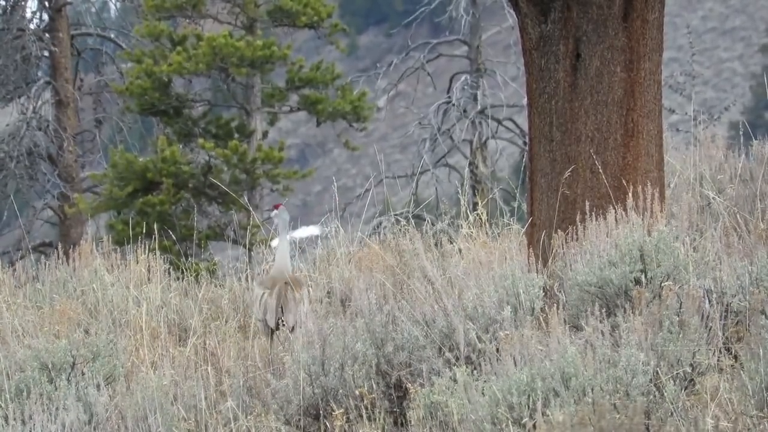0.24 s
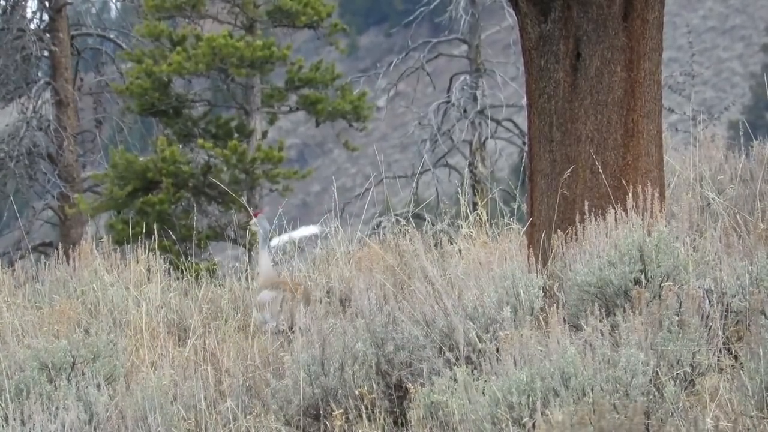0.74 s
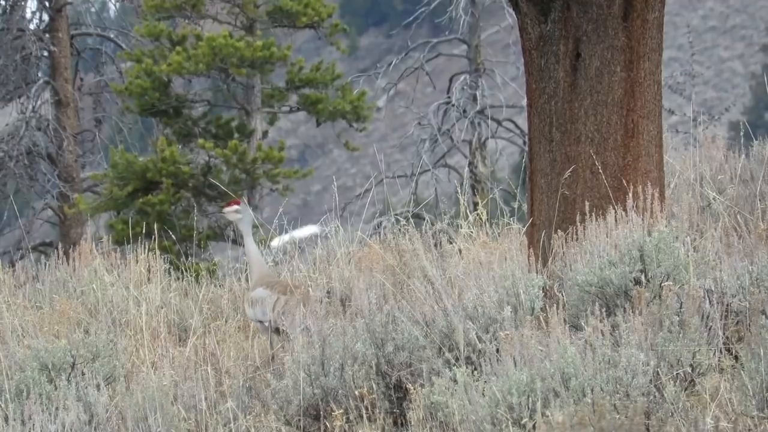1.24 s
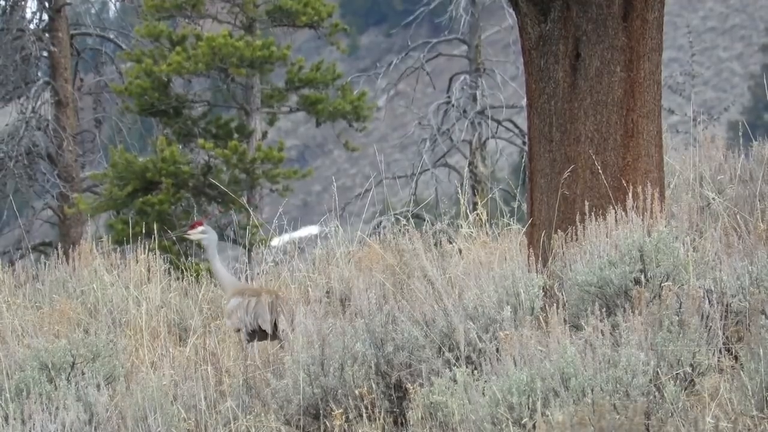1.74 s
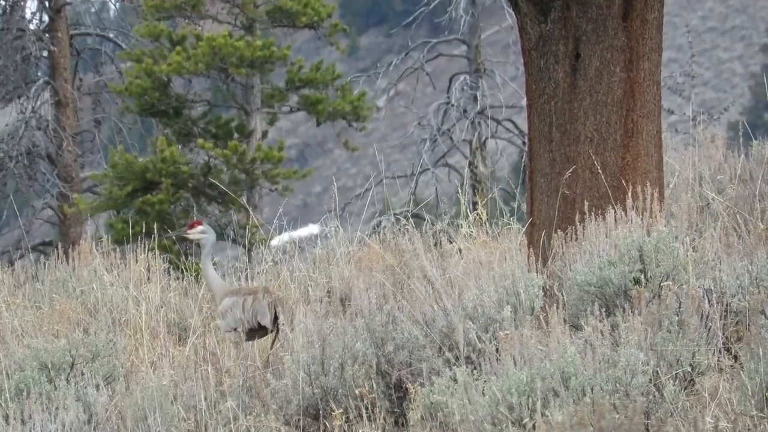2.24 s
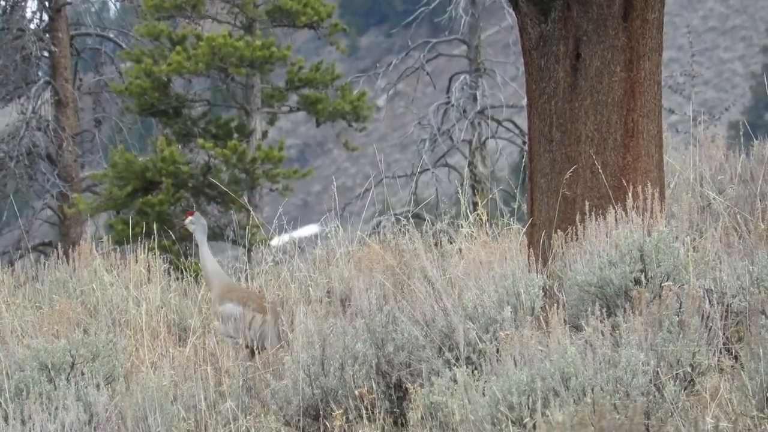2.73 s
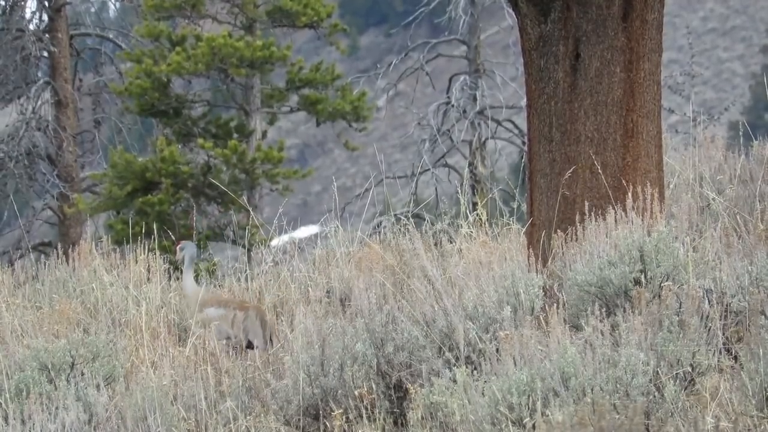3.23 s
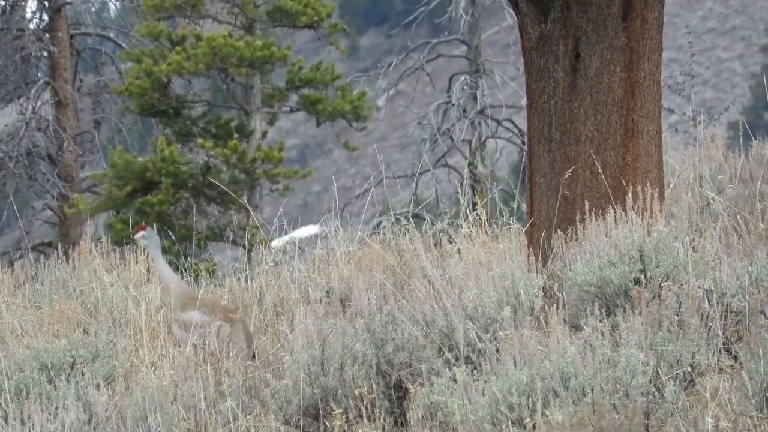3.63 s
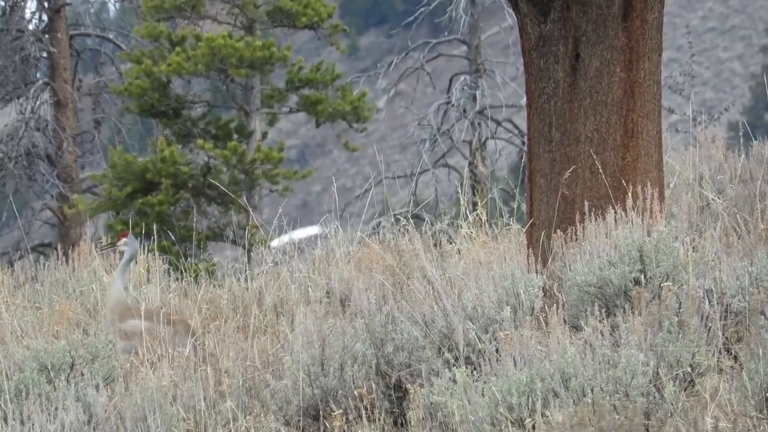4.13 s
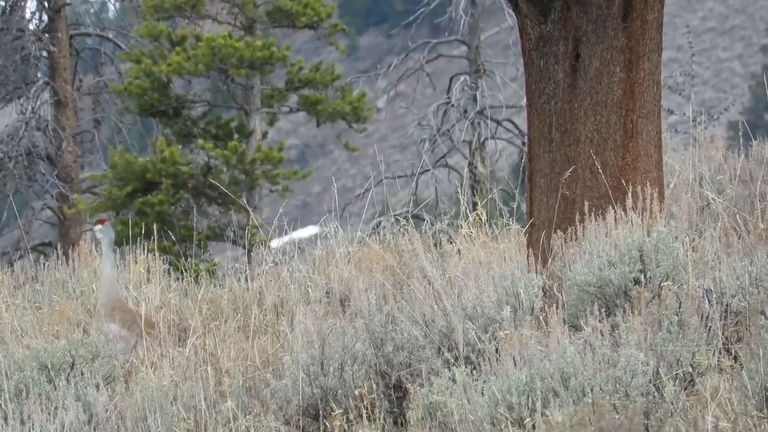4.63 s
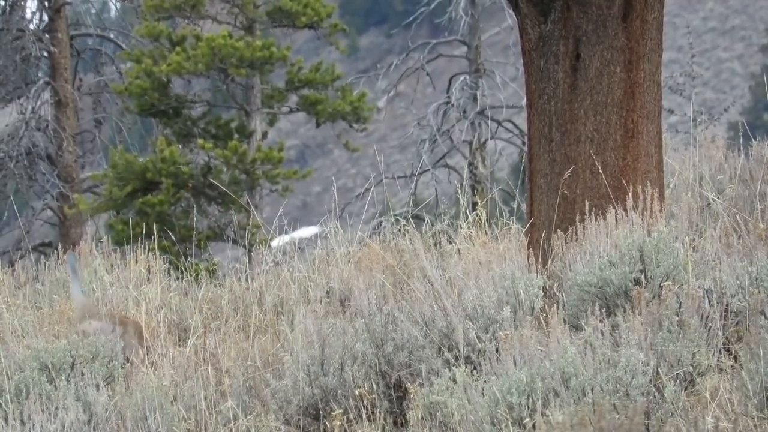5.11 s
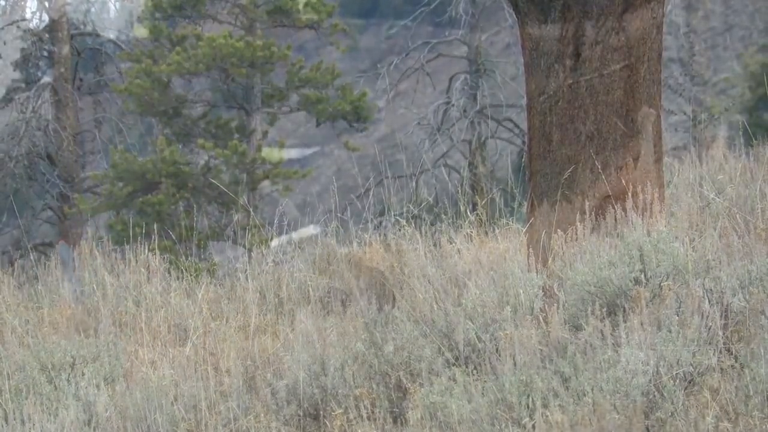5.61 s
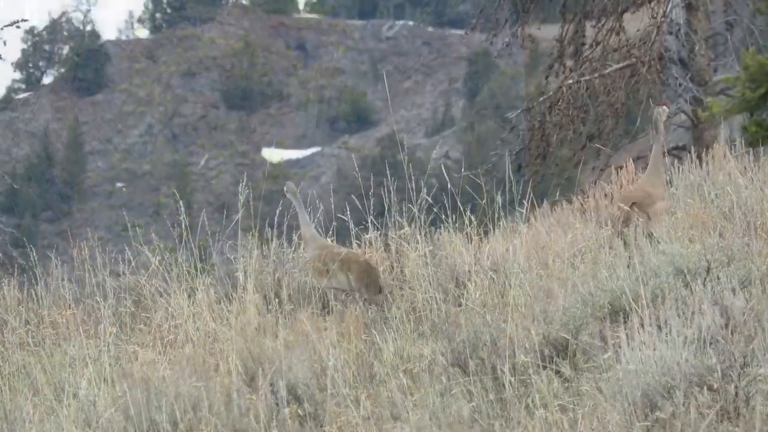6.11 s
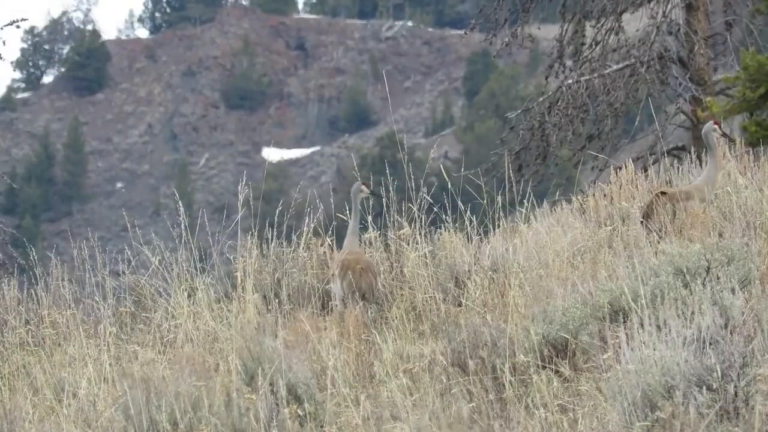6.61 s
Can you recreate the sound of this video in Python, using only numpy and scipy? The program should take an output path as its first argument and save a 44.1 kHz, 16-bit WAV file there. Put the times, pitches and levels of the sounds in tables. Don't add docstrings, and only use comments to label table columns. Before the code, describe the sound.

Two cranes call in turn, near and loud, on a wooded grassy slope. Each hoarse opening note breaks into a fast, hollow trumpeting rattle, one bird lower, one higher. Trunks and a distant hillside throw back blurred echoes. A small songbird whistles briefly early on, dry stalks snap, grass rustles and wind bumps the microphone. Near the end the calls turn soft and sparse in open ground.

```python
import sys
import numpy as np
from scipy import signal
from scipy.fft import rfft, irfft, next_fast_len
from scipy.io import wavfile
from scipy.ndimage import uniform_filter1d

SR = 44100
rng = np.random.default_rng(int(sys.argv[2]) if len(sys.argv) > 2 else 0)


def to_wav(sig):
    pcm = np.clip(np.atleast_2d(sig), -1, 1) * 32767
    pcm = np.round(pcm).astype(np.int16)
    wavfile.write(sys.argv[1], SR, pcm.T)


def volts(x):
    e = np.asarray(x, float) / 20
    return 10 ** e


N = 302526
CHANGE_START_S, CHANGE_END_S = 5.6, 5.68

LOW_VOICE = [0, -8, -16.5, -20, -19, -24.5, -30.5, -34.5, -40.5]


def evened(x):
    return x / np.sqrt(np.mean(x ** 2) + 1e-20)


def read(points, hz):
    f, value = np.transpose(points)
    return np.interp(np.log(hz + 1), np.log(f + 1), value)


def colour(x, points):
    size = next_fast_len(x.shape[-1])
    gain = volts(read(points, np.fft.rfftfreq(size, 1 / SR)))
    return irfft(rfft(x, size) * gain, size)[..., :x.shape[-1]]


def add(mix, s, sound):
    part = mix[..., max(round(s * SR), 0):][..., :sound.shape[-1]]
    part += sound[..., :part.shape[-1]]


def openness(t):
    return np.interp(t, [CHANGE_START_S, CHANGE_END_S], [0, 1])


def swells(t, steady_db, s, half, db):
    bells = volts(db)[:, None] ** 2 * np.exp(-((t - s[:, None]) / half[:, None]) ** 2)
    return np.sqrt(volts(steady_db) ** 2 + bells.sum(0))


def background():
    # f/Hz, level/dB per Hz
    air_spectrum = [(20, -54), (45, -39), (90, -2), (200, 2), (480, 4.5), (1000, -5.5), (2000, -12.5),
                    (3100, -15), (5000, -20.5), (8000, -28), (13000, -37), (15400, -45)]
    grass_spectrum = [(1000, -16), (3000, -12.5), (5000, 0), (8000, 3), (11000, -1), (13000, -5),
                      (15400, -36)]
    wind_spectrum = [(15, 6), (32, 14), (50, 21), (90, 16.5), (200, -41)]
    # f/Hz, left-right likeness
    likeness = [(60, 1), (130, -0.7), (290, -0.64), (640, -0.9), (1400, -0.74), (3090, 0.087), (6790, 0.02),
                (14900, -0.22)]
    # t/s, half length/s, grass level/dB, low rustle level/dB
    swishes = [
        (0.732, 0.036, -70, -45),
        (2.63, 0.035, -81, -40),
        (4.878, 0.13, -57, -44.5),
        (5.255, 0.39, -63.5, -47.5),
    ]
    # t/s, half length/s, peak level/dB
    puffs = [
        (.13, .04, -70),
        (3.17, .1, -67),
        (4.028, 0.046, -46),
        (4.2, .1, -55),
        (5.58, 0.036, -49),
        (5.798, 0.047, -44),
        (6.073, 0.016, -55),
        (6.25, 0.15, -59),
        (6.51, 0.078, -55.5),
    ]
    frames, hz = N // 256 + 5, np.fft.rfftfreq(1024, 1 / SR)
    t = np.arange(frames) * 256 / SR
    a, b, c, d, e, f, patches = rng.standard_normal((frames, 513, 7)).T
    patches = evened(uniform_filter1d(uniform_filter1d(patches, 14, 0), 10, 1))

    s, half, swish_db, rustle_db = np.transpose(swishes)
    fade_db = -1.5 * np.maximum(t - CHANGE_END_S, 0)
    air_gain = swells(t, -41.5 - 6 * openness(t) + fade_db, s, half, rustle_db)
    grass_gain = swells(t, -71 - 9 * openness(t) + fade_db, s, half, swish_db)
    wind_gain = swells(t, -82, *np.transpose(puffs)) * volts(-10.0)
    air = evened(volts(read(air_spectrum, hz)))[:, None] * air_gain * volts(1.8 * patches)
    grass = evened(volts(read(grass_spectrum, hz)))[:, None] * grass_gain * volts(5.0 + 1.4 * patches)
    wind = evened(volts(read(wind_spectrum, hz)))[:, None] * wind_gain

    same = np.clip(read([(40, 0.27)] + likeness, hz), -1, 1)[:, None]
    left = a + 1j * b
    right = same * left + np.sqrt(1 - same ** 2) * (c + 1j * d)
    field = np.array([left, right])
    plain = np.std(signal.istft(left, nperseg=1024, noverlap=768)[1])
    struck = (e + 1j * f + 1.3 * field) * wind
    spectra = np.array([field * np.hypot(air, grass), struck]) / plain
    hiss, rumble = signal.istft(spectra, nperseg=1024, noverlap=768)[1][..., :N]
    return colour(hiss, [(35, -27), (70, -0.5)]) + rumble


def snaps():
    # t/s, peak level/dB, left-right/dB, lowest f/Hz, highest f/Hz
    stalks = [
        (0.76, -34, 3, 2980, 13500),
        (2.6184, -37, 2, 3000, 13500),
        (2.6612, -29, 1, 2940, 13500),
        (4.6494, -35, 6, 3000, 13500),
        (4.7237, -41, 2, 2980, 13500),
        (5.608, -41, -2, 3000, 13500),
        (5.7134, -43, 1, 3000, 13500),
        (5.787, -42, 10, 3000, 13500),
              (5.169, -23, 0, 407, 2500),
        (5.43, -31, 0, 300, 1700),
        (5.888, -37.5, -1, 2200, 13500),
        (6.121, -35, 0, 250, 13500),
    ]
    out, t = np.zeros((2, N)), np.arange(700) / SR
    decay = np.exp(-t / .0006) + .12 * np.exp(-t / .004)
    for (s, db, pan_db, low_hz, high_hz), noise in zip(stalks, rng.standard_normal((20, 700))):
        band = signal.butter(3, [low_hz, high_hz], "band", fs=SR)
        crack = signal.lfilter(*band, noise * decay)
        sides = volts(db + np.array([[pan_db], [-pan_db]]) / 2)
        add(out, s, sides * crack / abs(crack).max())
    return out


def songbird():
    # t/s, length/s, level/dB, first f/Hz, last f/Hz
    chirps = [(.865, .045, -53, 2400, 2550), (.995, .025, -52, 3900, 3850), (1.005, .025, -55, 3150, 3100),
              (1.06, .05, -51, 2250, 2600), (1.11, .025, -56, 3150, 3000), (1.705, .035, -52, 2780, 2620),
              (1.725, .03, -48, 2700, 3650), (1.745, .035, -47, 3500, 3000), (1.82, .025, -58, 3600, 3750),
              (1.875, .028, -52, 3300, 2900), (1.885, .02, -58, 5500, 5350), (1.9, .03, -57, 4000, 4150),
              (2.0, .045, -54, 3400, 3550), (2.045, .04, -57, 3750, 3950), (2.082, .048, -49, 3650, 2800),
              (2.13, .03, -58, 4900, 4700), (2.19, .035, -58, 5300, 5450), (2.2, .03, -58, 3200, 2900)]
    out = np.zeros(N)
    for s, length, db, first_hz, last_hz in chirps:
        hz = np.linspace(first_hz, last_hz, round(length * SR))
        whistle = np.sin(2 * np.pi * np.cumsum(hz) / SR) * np.hanning(len(hz))
        add(out, s, volts(db + 3) * whistle)
    return out


def hillside(breath):
    # t/s, level/dB
    effort = [(0, -31), (.2, -36.5), (1.15, -36), (1.45, -31.5), (1.72, -38.5), (2.44, -36.5),
              (2.95, -40.5), (3.6, -40), (3.99, -33.5), (4.22, -36.5), (4.6, -36.5), (4.9, -34.5),
              (5.16, -35), (5.39, -34), (5.6, -39.5), (6.15, -50.5), (6.86, -42.5)]
    # f/Hz, level/dB
    path = [(450, 3), (650, 6.5), (950, -2), (1600, -10.5), (2500, -16), (5000, -16.5)]
    # rise/s, hold/s, fall/s, pitch sag 0-1, breath/dB, echo delay/s, echo tilt/dB per octave
    far_pulse = (.0013, .005, .0035, .03, -20, .032, 4)
    times, crowds = np.arange(0, N / SR - .06, .007), []
    for chance in rng.random((2, N // 200, 4)):
        rows = []
        for s, (late, soft, tune, bird) in zip(times, chance):
            hz = (770 if bird < .5 else 895) * (.9 + .18 * tune)
            rows.append((s + .007 * late, -6 * soft, hz, 0, -3))
        crowds.append(evened(colour(rattle(rows, LOW_VOICE[:3], far_pulse, breath), path)))
    s, db = np.transpose(effort)
    wide = 0.24 * np.array([[1], [-1]]) * crowds[1]
    return volts(np.interp(np.arange(N) / SR, s, db)) * (crowds[0] + wide)


def wood(x):
    # f/Hz, t60/s
    decays = [(500, 0.73), (1300, 0.41), (3000, 0.42), (8000, 0.26)]
    taps = np.zeros((2, SR // 2))
    at = np.arange(300, SR // 2 - 20, 20)
    at = at + rng.integers(0, 20, (2, len(at)))
    np.put_along_axis(taps, at, rng.choice([-1., 1.], at.shape), 1)
    taps += taps[::-1]
    hz, t, z = signal.stft(taps, SR, nperseg=256)
    tail = signal.istft(z * volts(-60 * t / read(decays, hz)[:, None]), SR, nperseg=256)[1]
    wet = signal.fftconvolve(x[None], tail / np.linalg.norm(tail[0]), axes=1)[:, :N]
    return volts(-5.5 - 5 * openness(np.arange(N) / SR)) * wet


def stack(hz, voice_db, tilt_db, uneven_db):
    k = np.arange(1, len(voice_db) + 1)[:, None]
    level = volts((np.array(voice_db) + uneven_db)[:, None] + tilt_db * np.log2(k))
    return (level * np.sin(2 * np.pi * k * np.cumsum(hz) / SR + k ** 2)).sum(0)


def openings(breath):
    # t/s, mouth resonance f/Hz, level/dB, first f/Hz, last f/Hz
    notes = [(.08, 1200, -43, 600, 580), (.48, 2030, -31.5, 499.5, 541), (1.145, 1400, -37.5, 638, 706),
             (1.345, 1290, -36, 639, 662), (2.89, 1170, -34.5, 562.7, 609), (3.05, 1170, -38, 592, 585),
             (3.777, 1250, -33.5, 590.4, 663), (4.005, 1180, -34, 554, 617), (4.715, 1550, -33.5, 704, 787),
             (4.97, 1210, -31.5, 590, 590), (5.472, 1330, -32, 622, 699.5), (5.822, 1780, -39, 605, 593),
             (6.445, 1274, -46, 604, 663)]
    voice_db = [5.5, -3, -4.5, -13.5, -11.5, -19, -32, -35, -44]
    rough = .24
    out, wobble = np.zeros(N), evened(uniform_filter1d(rng.standard_normal(N), 130))
    u = np.linspace(0, 1, 3400)
    swell = signal.windows.tukey(len(u), .45) * (.4 + .8 * np.sin(np.pi * u) ** 2)
    for s, mouth_hz, db, first_hz, last_hz in notes:
        at = slice(round(s * SR), round(s * SR) + len(u))
        hz = (first_hz + (last_hz - first_hz) * u) * (1 + .11 * rough * wobble[at])
        orders_hz = np.mean(hz) * np.arange(1, len(voice_db) + 1)
        mouth_db = 8.4 * np.exp(-((orders_hz - mouth_hz) / 300) ** 2)
        tone = evened(stack(hz, voice_db, 0, mouth_db))
        gate = 1 + 2.0 * np.cos(2 * np.pi * np.cumsum(hz) / SR)
        rasp = (1.4 - u) * gate * breath[at]
        out[at] += volts(db) * swell * (tone + 0.92 * rough * volts(-6.0 * openness(s)) * rasp)
    return out


def rattle(rows, voice_db, shape, breath):
    rise, hold, fall, sag, breath_db, delay, echo_tilt_db = shape
    t, out, voice_db = np.arange(1700) / SR, np.zeros(N), np.array(voice_db, float)
    attack = np.sin(np.pi / 2 * np.clip(t / rise, 0, 1))
    body = attack * np.exp(-np.maximum(t - rise - hold, 0) / fall)
    blurred = np.convolve(body, np.hanning(400) / 200)[:len(t)]
    overtone = np.arange(len(voice_db)) > 0
    thin_db = -5 * ~overtone
    jitter = evened(uniform_filter1d(rng.standard_normal(N + SR), 70))
    uneven = rng.standard_normal((len(rows), 2, len(voice_db))) * overtone
    for (s, db, hz, tilt_db, echo_db), (here, there) in zip(rows, uneven):
        at = slice(round(s * SR), round(s * SR) + len(t))
        pitch = hz * (1 + sag * (1 - 2 * t / (hold + fall)).clip(-1) + .017 * jitter[at])
        echo_pitch = hz * (1.018 + .018 * jitter[at])
        puff = volts(breath_db + 2 * tilt_db) * breath[at]
        direct = stack(pitch, voice_db, tilt_db, 2 * here) + puff
        thrown = stack(echo_pitch, voice_db, tilt_db + echo_tilt_db, 2 * there + thin_db) + 2 * puff
        add(out, s, volts(db) * body * direct)
        add(out, s, volts(db + echo_db + 8) * np.hanning(len(t)) * puff)
        add(out, s + delay, volts(db + echo_db) * blurred * thrown)
    return out


def pulses(calls, tone):
    hz, drop, tilt_db, open_db = tone
    first_gap_s, last_gap_s, quicken = .061, .040, .6
    gaps = last_gap_s + (first_gap_s - last_gap_s) * quicken ** np.arange(11)
    beats = np.r_[0, np.cumsum(gaps)]
    rows = []
    for (start, end, db, end_db, echo_db), chance in zip(calls, rng.standard_normal((len(calls), 3, 12))):
        last = max(abs(beats - end + start).argmin(), 1)
        u = np.arange(last + 1) / last
        a, b, c = chance[:, :last + 1]
        times = start + beats[:last + 1] * (end - start) / beats[last]
        levels_db = db + end_db * u ** 2 + 1.2 * a
        pitches = hz * (1 - drop * u + .015 * b)
        tilts_db = tilt_db + open_db * openness(start) + 1.5 * u * (1 - 2 * openness(start))
        rows += zip(times, levels_db, pitches, tilts_db, echo_db + 2.5 * c)
    return [(max(s, 0), *rest) for s, *rest in rows if s > -.015]


def low_crane(breath):
    # first pulse t/s, last pulse t/s, peak level/dB, change by the end/dB, trunk echo/dB
    calls = [
        (-.205, .119, -16, -26, 1),
        (.567, .767, -21.5, -9, -5),
        (1.437, 1.677, -21.5, -14, -3.5),
        (2.994, 3.275, -23.5, -1.5, -2),
        (3.875, 4.071, -22.5, -4, -2),
        (4.822, 5.022, -21, -3, -2.5),
        (5.586, 5.741, -23.5, -4.5, -1),
        (5.774, 6.02, -35, 2.5, -11),
        (6.555, 6.709, -32, -4.5, -26),
    ]
    # rise/s, hold/s, fall/s, pitch sag 0-1, breath/dB, echo delay/s, echo tilt/dB per octave
    pulse = (.0013, .009, .004, .035, -18, .018, 2.5)
    # f/Hz, pitch drop 0-1, brightness/dB per octave, its change in the open/dB per octave
    tone = (780, .008, -2.2, 1)
    return rattle(pulses(calls, tone), LOW_VOICE, pulse, breath)


def high_crane(breath):
    calls = [
        (.18, .42, -19, -4, -11.5),
        (1.269, 1.599, -22, -6, -3),
        (3.15, 3.479, -19.5, -3.5, -4.5),
        (3.512, 3.569, -25, -13.5, -3.5),
        (4.114, 4.351, -17.5, -5, -7.5),
        (5.084, 5.364, -20.5, -10, -3.5),
        (5.93, 6.259, -28, -3.5, -19.5),
    ]
    pulse = (.0013, .006, .0035, .045, -17, .024, 5.5)
    tone = (892, .006, -3.5, 4.5)
    voice_db = [-1.5, -11.5, -24.5, -22.5, -26.5, -36, -41, -44]
    return rattle(pulses(calls, tone), voice_db, pulse, breath)


def cranes(breath):
    # f/Hz, level/dB
    beak = [(300, -33), (520, -11), (600, -5.5), (700, 0), (3000, -0.5), (6000, -1.5), (10000, 0)]
    rattles = low_crane(breath) + high_crane(breath[999:])
    return colour(volts(-1.0) * rattles + openings(breath), beak)


def scene():
    # f/Hz, level/dB
    breath_spectrum = [(300, -24), (700, -0.5), (1500, -2), (3000, -6.5), (5000, -15), (7000, -35),
                       (12000, -48)]
    breath = evened(colour(rng.standard_normal(N + SR), breath_spectrum))
    birds = cranes(breath)
    near = birds * volts(np.array([[.3], [-.3]])) + wood(birds)
    return near + hillside(breath) + background() + snaps() + songbird()


def band_limit(x):
    return signal.sosfilt(signal.butter(12, 15530, fs=SR, output="sos"), x)


def record(dry):
    return band_limit(dry)


dry = scene()
out = record(dry)
to_wav(out)
```